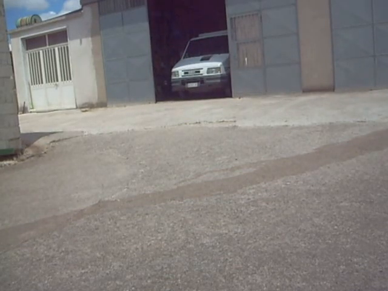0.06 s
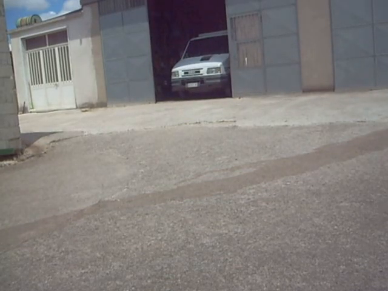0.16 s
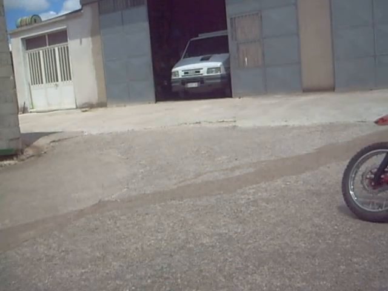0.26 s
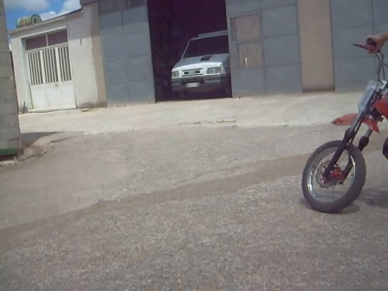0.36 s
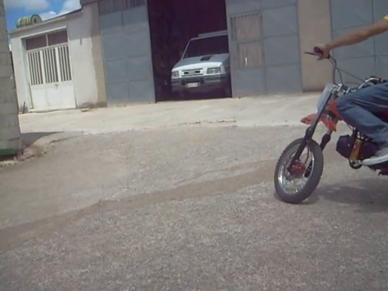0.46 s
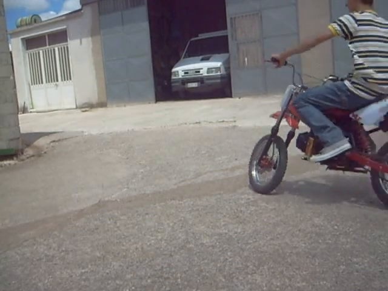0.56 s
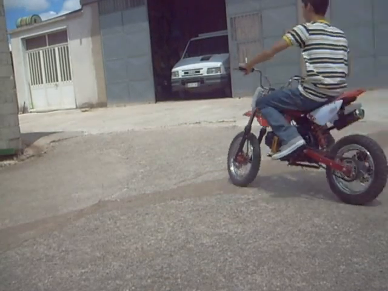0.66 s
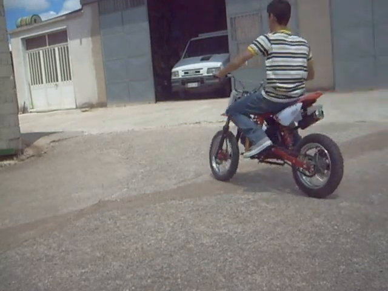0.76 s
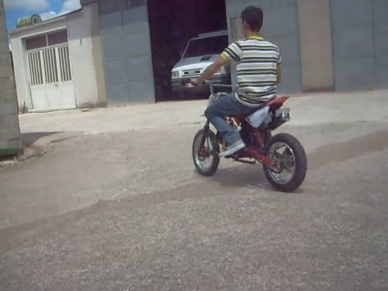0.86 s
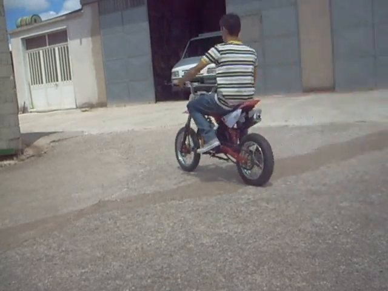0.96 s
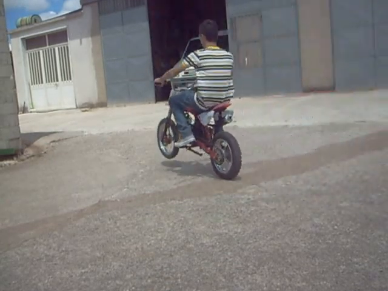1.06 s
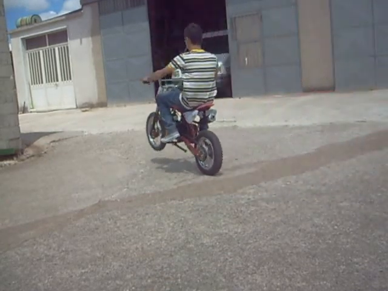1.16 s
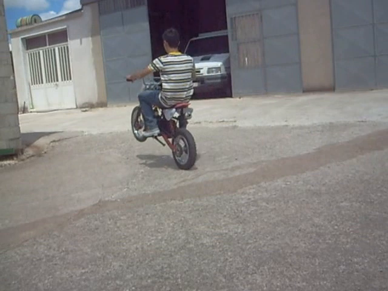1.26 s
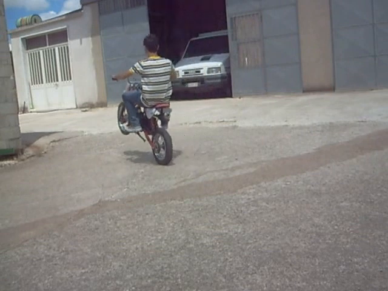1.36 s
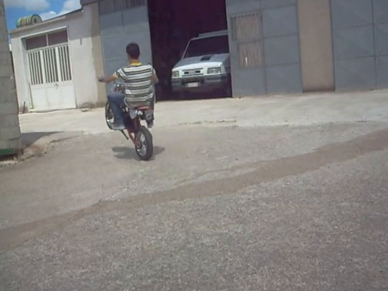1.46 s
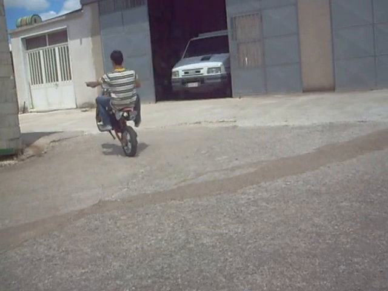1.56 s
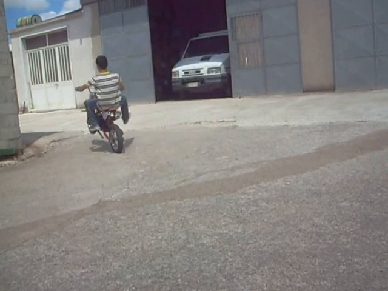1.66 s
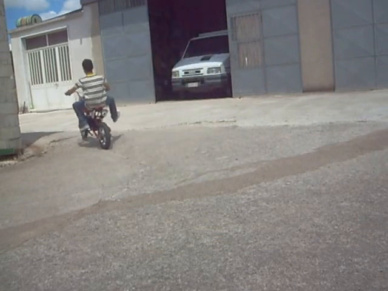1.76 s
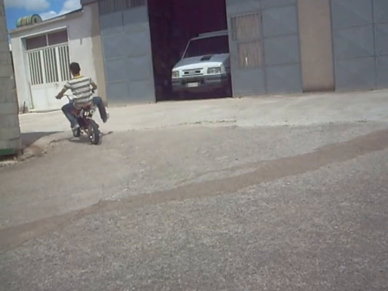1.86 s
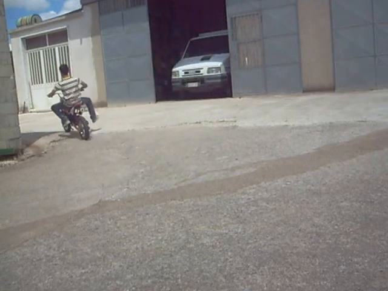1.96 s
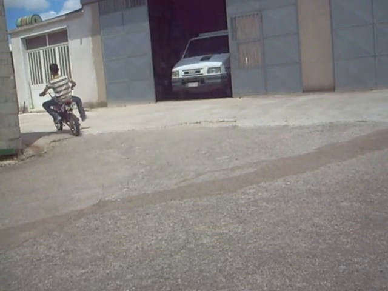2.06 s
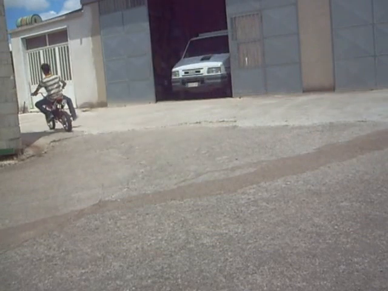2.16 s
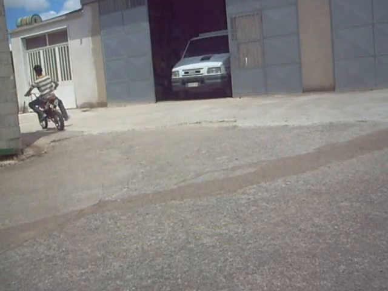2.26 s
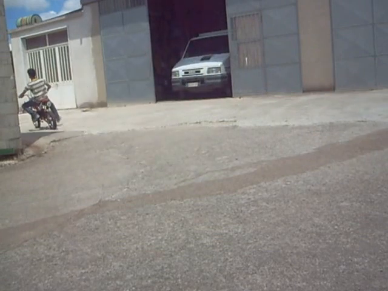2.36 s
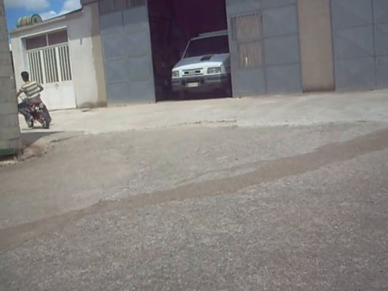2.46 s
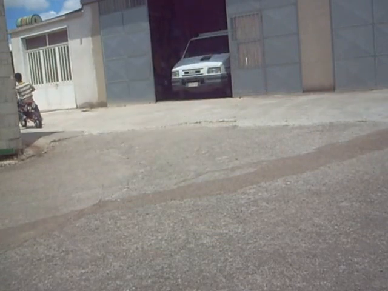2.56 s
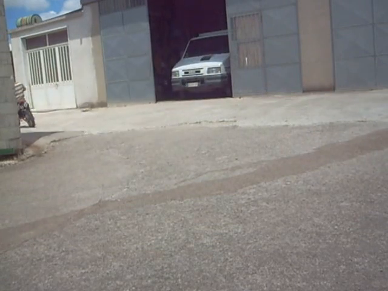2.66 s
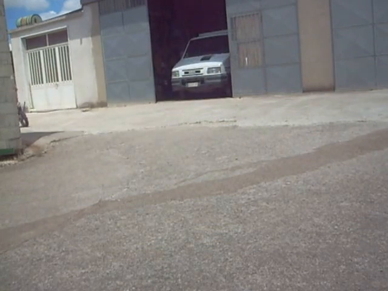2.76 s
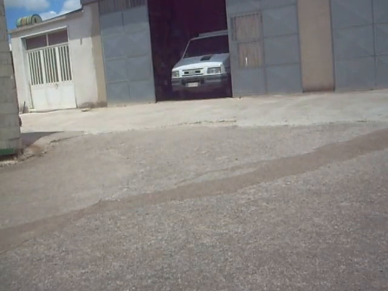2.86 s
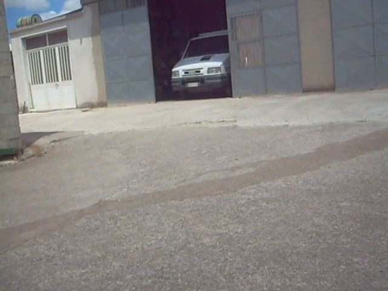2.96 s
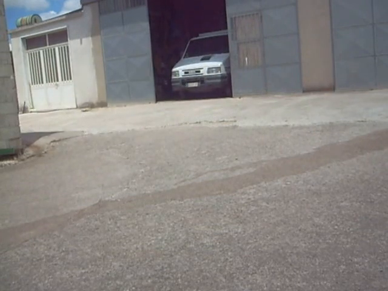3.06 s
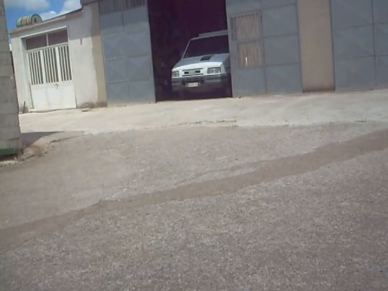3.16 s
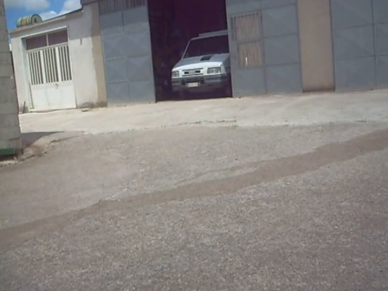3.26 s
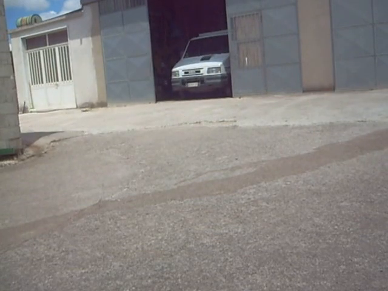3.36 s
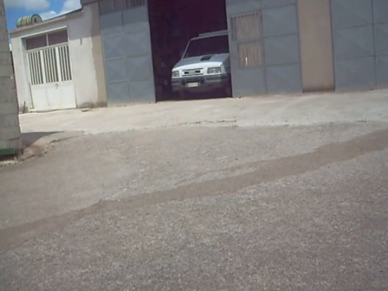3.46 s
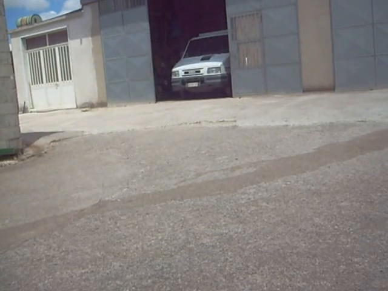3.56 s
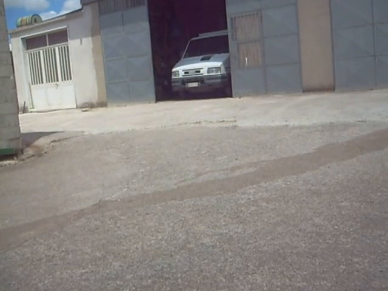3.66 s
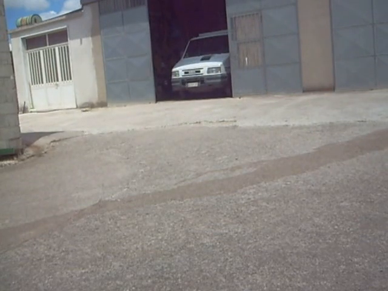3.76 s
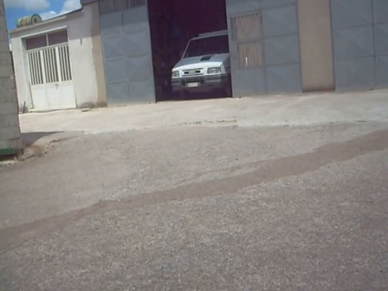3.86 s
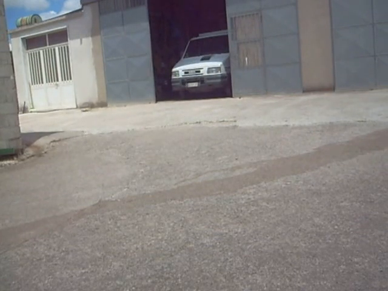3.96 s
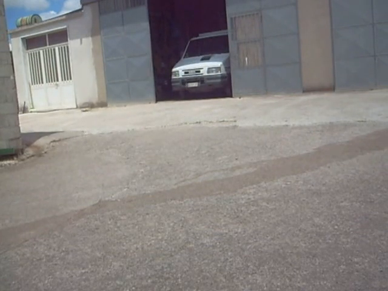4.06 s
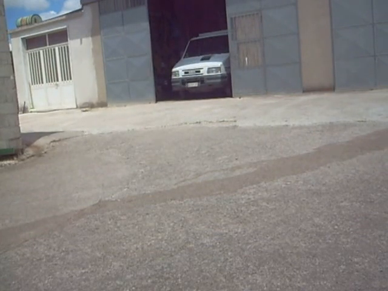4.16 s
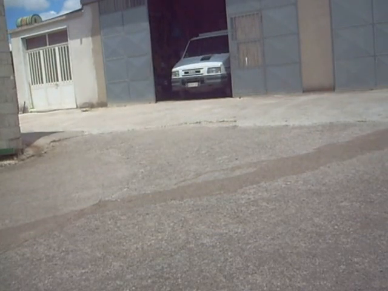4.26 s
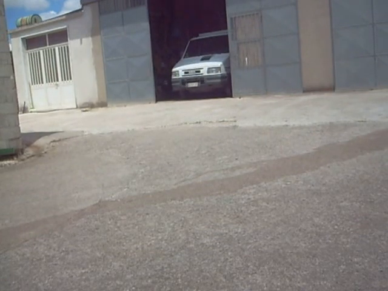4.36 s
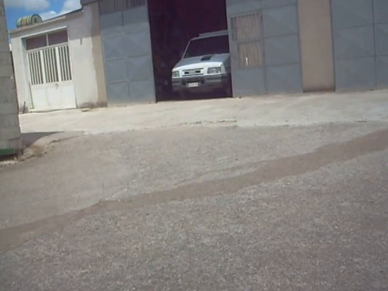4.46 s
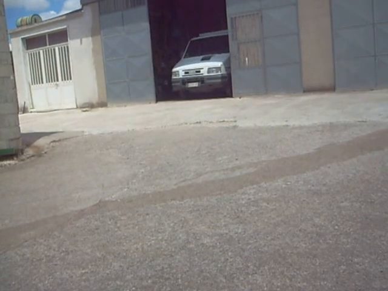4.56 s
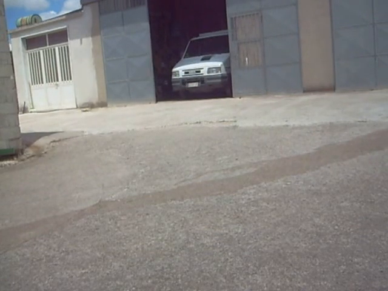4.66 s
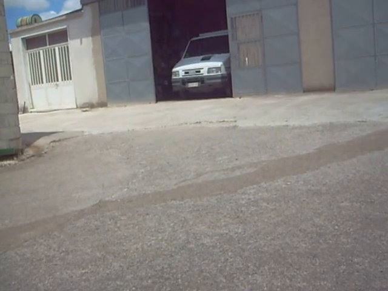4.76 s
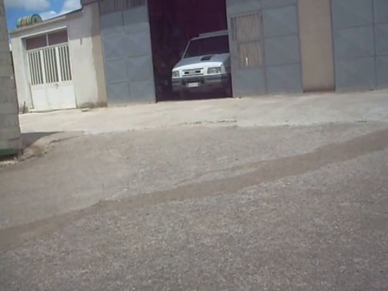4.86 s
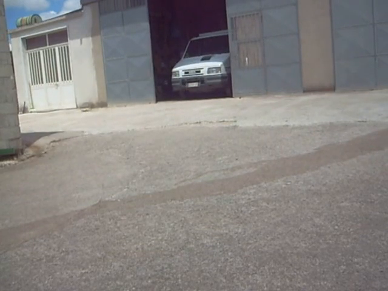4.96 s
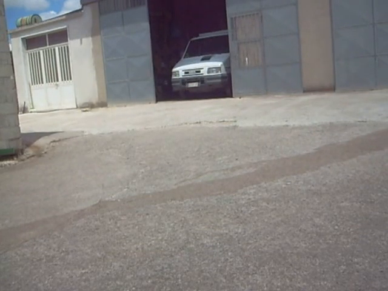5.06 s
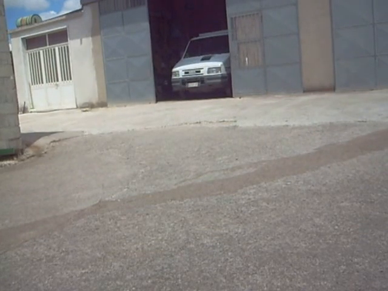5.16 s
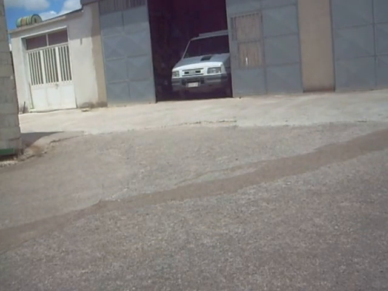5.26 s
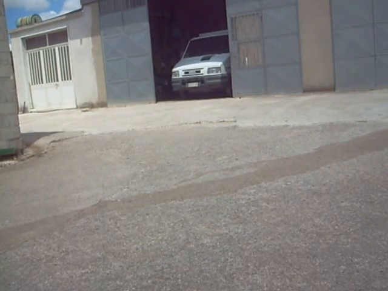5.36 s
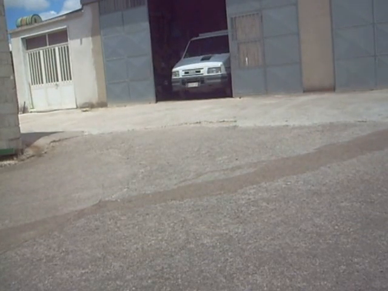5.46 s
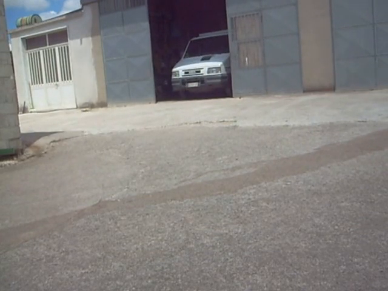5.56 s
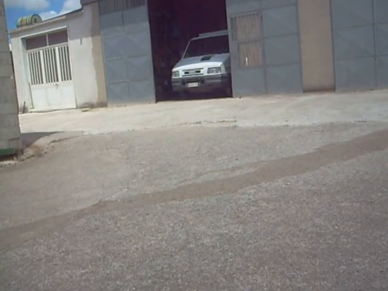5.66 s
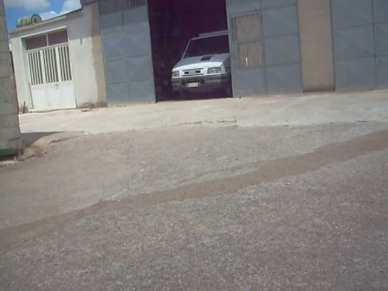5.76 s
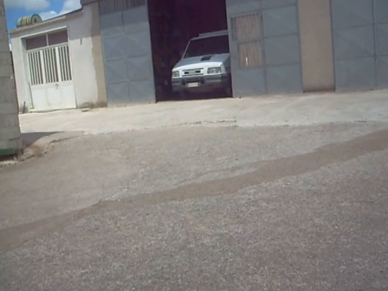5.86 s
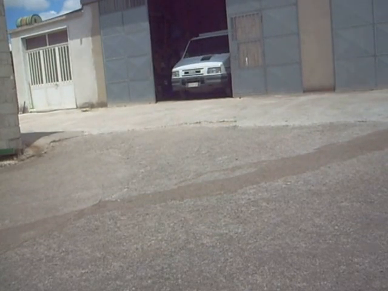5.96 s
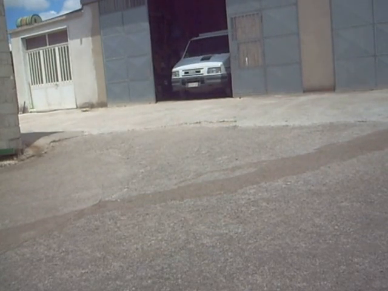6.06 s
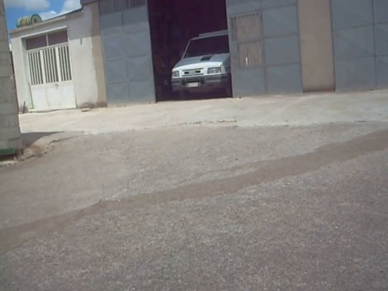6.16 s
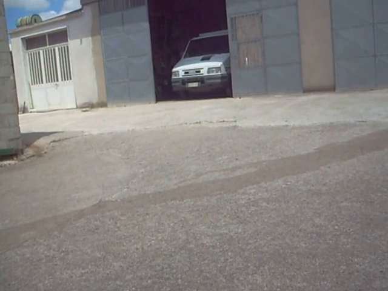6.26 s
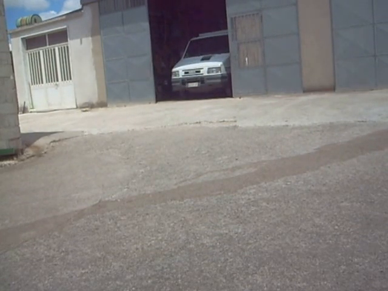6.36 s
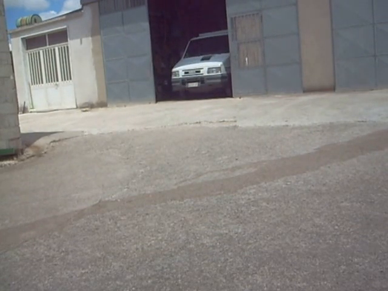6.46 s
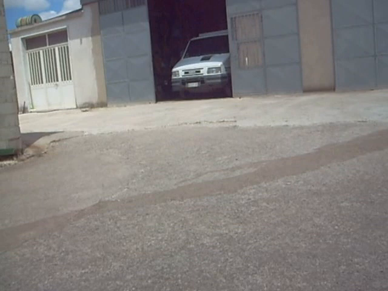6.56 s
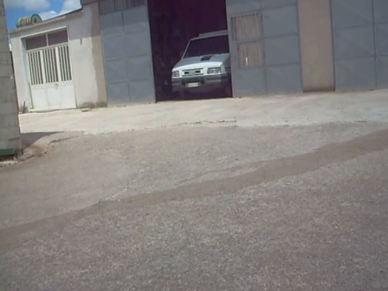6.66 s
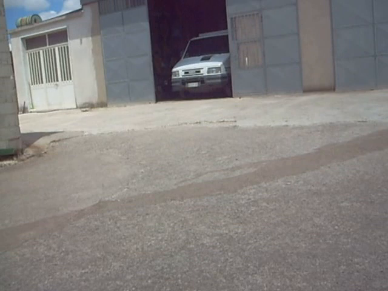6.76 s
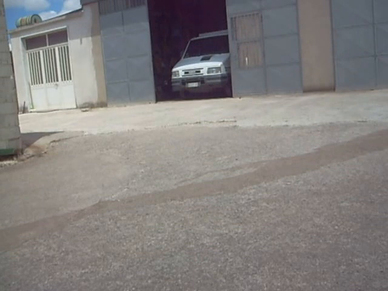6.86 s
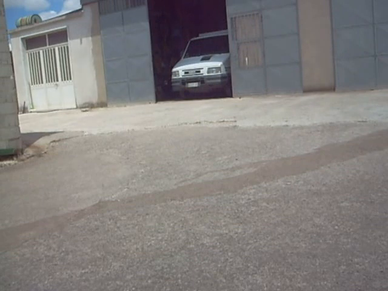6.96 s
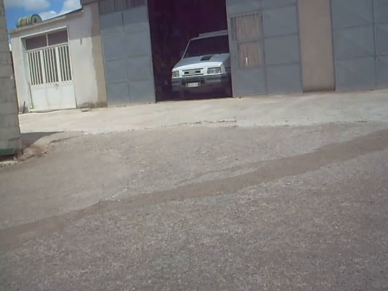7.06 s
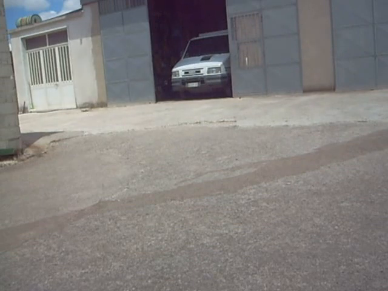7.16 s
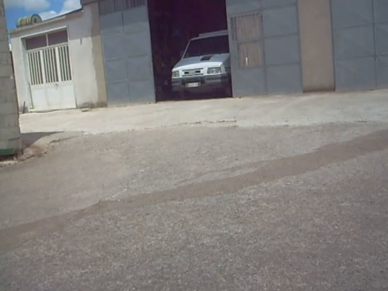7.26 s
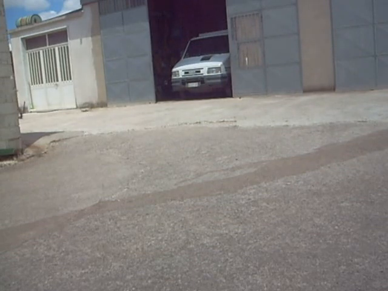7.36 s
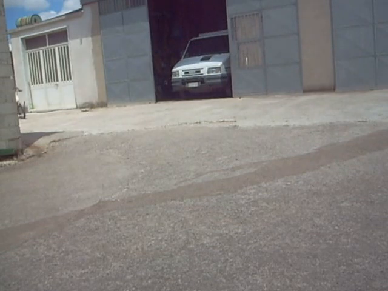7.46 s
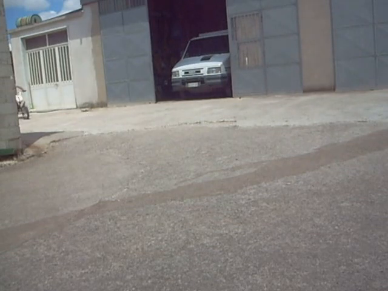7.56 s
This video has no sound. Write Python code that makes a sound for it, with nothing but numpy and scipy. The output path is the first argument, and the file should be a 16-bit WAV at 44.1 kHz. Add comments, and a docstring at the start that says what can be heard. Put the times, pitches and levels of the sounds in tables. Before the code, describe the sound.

Raspy little dirt bike blips and accelerates away across a hard yard, drops to distant uneven puttering, then gives another muffled burst of throttle.

```python
"""A small single-cylinder motorbike, mostly screened by a wall throughout, revs in bursts, pulls away to a
rough idle, then blips again. Each firing barks at the exhaust outlet and thumps in the pipe; ground and sheds
echo the bark. Valve clatter, jingle, loose metal and drive knocks ride on top, over air buffeting and faint
hiss. Outlet and small microphone give the bark a peak near 3 kHz; overloads clip."""
import sys
import numpy as np
from scipy import signal
from scipy.fft import rfft, irfft
from scipy.io import wavfile
from scipy.ndimage import uniform_filter1d

SR = 44100
rng = np.random.default_rng(int(sys.argv[2]) if len(sys.argv) > 2 else 0)


def how_loud(loudness_db):
    """Turn decibels into a plain amplitude multiplier (0 dB gives 1, 20 dB gives 10)."""
    steps = np.asarray(loudness_db, float) / 20
    return 10 ** steps


def persist_wave(psi):
    """Save psi, clipped to +-1, as 16-bit WAV."""
    counts = np.round(np.clip(psi, -1, 1) * 32767).astype(np.int16)
    wavfile.write(sys.argv[1], SR, np.atleast_2d(counts).T)


N = 336042
T = np.arange(N) / SR

# engine speed: time_s, firings_per_s
FIRING_RATE = [(0.0, 20.05), (0.12, 17.19), (0.22, 24.47), (0.37, 17.81), (0.47, 18.4), (0.56, 27.9),
               (0.62, 18.5), (0.87, 17.88), (0.98, 22.13), (1.04, 31.52), (1.15, 27.7), (1.44, 35.37),
               (1.52, 27.68), (1.61, 33.46), (1.69, 30.87), (1.86, 33.75), (1.98, 28.48), (2.05, 29.0),
               (2.15, 30.5), (2.25, 30.0), (2.41, 26.6), (2.78, 16.69), (2.94, 14.54), (3.33, 12.91),
               (3.55, 15.72), (3.95, 14.13), (4.35, 15.91), (4.55, 14.2), (4.73, 15.7), (5.14, 15.49),
               (5.61, 16.8), (5.86, 30.44), (6.0, 33.09), (6.3, 27.6), (6.36, 28.5), (6.49, 33.3),
               (6.555, 34.0), (6.64, 28.3), (6.71, 23.8), (6.79, 16.73), (7.1, 17.34), (7.62, 14.57)]
# firings of set strength: time_s, level_db
SET_FIRINGS = [(.508, 1.5), (.548, 3.5), (1.003, -3), (1.039, 4), (1.368, -1.5), (1.398, -5.5), (1.427, 0),
               (1.457, -1.5), (1.487, -9), (1.649, 2.5), (1.745, 1), (1.776, 4), (1.836, 1.5), (1.866, 2.5),
               (1.897, 2), (2.665, 3.5), (2.776, 8), (2.837, 6), (3.261, 5.5), (3.337, 7), (3.544, 6.5),
               (3.809, 8.5), (3.944, 6.5), (4.154, 2.5), (4.409, 7), (4.478, 9.5), (4.614, 10.5),
               (4.746, 9.5), (4.809, 8), (4.937, 8.5), (5.13, 11), (5.323, 3.5), (5.444, 8), (5.802, 3),
               (5.904, 4), (6.028, 4.5), (6.33, 7.5), (6.432, 4.5), (6.463, 4.5), (6.536, 2.5), (7.253, 6),
               (7.441, 3.5)]
# exhaust pipe modes: mode_hz, width_hz, open_throttle_db, shut_throttle_db
PIPE_MODES = [(65.5, 39, -19, -27), (108, 37, -20.5, 9.5), (166, 16.5, 10, 0.5), (235.6, 56, -31, 6),
              (288, 58, 4.5, -9), (324.8, 17.2, -17.5, 5), (447.5, 153, -10, -30.5), (642, 87, -33, -30)]
# revving pipe heard round the wall from far off: mode_hz, width_hz, level_db, heat_exponent
FAR_PIPE_MODES = [(65.2, 32, -10, .5), (164.7, 21.4, 7.5, 1.4), (301, 22, 6.5, .1), (353, 59, -2.5, 0.52),
                  (523, 70, -5, .5), (613, 62, -10, 0.24), (720, 65, -8.5, .3)]
# microphone and outlet colour: freq_hz, gain_db
OUTLET_COLOUR = [(400, -27), (700, -17), (1050, -18.5), (1250, -11.5), (1600, 0), (2000, -5.5), (2500, 5),
                 (2850, 6.5), (3200, -3), (3600, -10), (4000, -14.5), (5000, -24), (7500, -29),
                 (10000, -35), (13000, -66.5), (16000, -84.5)]
# ground and shed fronts: delay_s, level_db
YARD_ECHOES = [(.0025, -8), (0.013, -19), (0.017, -24), (0.024, -15), (.033, -25), (0.046, -9)]
# loose metal shakes: start_s, drive_db, decay_s
METAL_RATTLES = [(0.252, -41, 0.0085), (0.37, -39, .006), (0.925, -33.5, 0.01), (0.959, -29, 0.0097),
                 (2.237, -32.5, 0.016), (2.283, -36, 0.014), (3.01, -55, 0.055), (3.28, -55, 0.053),
                 (3.33, -45.5, 0.038), (3.6, -62, 0.013), (3.67, -55.5, 0.017), (3.74, -56, 0.013),
                 (3.937, -55, 0.0096), (4.01, -56, 0.012)]
# metal part modes: mode_hz, width_hz, level_db
TIN_MODES = [(4900, 317, 13.5), (5970, 370, 9.5), (6750, 570, 11.5), (8800, 5400, -3.5)]
# engine casing modes: mode_hz, width_hz, level_db
CASING_MODES = [(995, 112, 12.5), (1487, 665, 6), (1975, 190, -0.5)]
# drive slack taken up: start_s, drive_db, decay_s
DRIVE_KNOCKS = [(.25, -31.5, 0.035), (.552, -22.5, 0.017), (.584, -32, 0.043), (.7, -34, 0.025),
                (.974, -14.5, 0.0045)]
# throttle grip: start_s, roll_on_s, held_s, roll_off_s, added_opening_0_1, chain_pull (negative: coasting)
GRIP_TWISTS = [(.12, 0.09, 0.08, 0.082, 0.55, 0.15), (0.472, 0.036, 0.047, 0.16, 0.46, 0.17),
               (0.971, 0.035, 0.43, 0.13, 1, 0.35), (1.499, 0.2, 0.16, 0.19, 0.82, 0.54),
               (1.96, 0.11, 0.57, 0.114, 0.46, -0.25), (5.499, 0.34, 0.26, 0.23, 0.49, 0.5),
               (6.199, 0.3, 0.033, 0.22, 1, 0.4)]
# bike position: time_s, distance_m, wall_0_1, outlet_aim_0_1
BIKE_PATH = [(0, 2.9, 0.65, 0.04), (.25, 3.36, 0.85, 0.26), (0.5, 2.1, 0.73, 0.9), (0.702, 3.25, 0.8, 0.85),
             (.9, 2.42, 0.95, 0.91), (1.03, 2.07, 0.63, 0.98), (1.4, 2.2, 0.61, 0.82),
             (1.9, 2.75, 0.74, 0.9), (2.2, 4.07, 0.82, 1), (2.5, 5.5, 0.92, 0.98), (2.6, 7.9, 0.93, 0.87),
             (2.72, 11.1, 0.89, 0.65), (2.999, 12.7, 0.91, 0.44), (4.201, 16.5, 0.97, 0.16),
             (5.401, 19, 0.86, 0), (6.001, 10.6, 0.84, 0.19), (6.5, 8.25, 0.95, 0.18),
             (6.9, 11.7, 0.91, 0.01), (7.62, 15, 0.92, 0.07)]

START_PHASE_CYCLES = .92
ECHO_DRIFT = .06  # scale of the delay wander, share of delay
FAR_SHED_S, FAR_SHED_DB = .016, -1  # echo level with the wall fully between
# levels at 1 m, throttle shut; then added by full throttle, full aim, full wall
BARK_DB, BARK_OPEN_DB, BARK_AIM_DB, BARK_WALL_DB = -20.5, 12.5, 8, -4
PIPE_DB, PIPE_OPEN_DB, PIPE_AIM_DB, PIPE_WALL_DB = -23, 4.5, -1.5, -0.5
PIPE_FAR_OPEN_DB = -1  # full throttle, far off
# treble relative to bark
TREBLE_DB, TREBLE_OPEN_DB, TREBLE_AIM_DB, TREBLE_WALL_DB = -18.5, 4.5, 3, -7
TREBLE_REMOTE_OPEN_DB = -4
# shares: idle gas load; clatter in the open, behind the wall (capped in bark), masked by firing load
IDLE_LOAD, CLATTER_NEAR, CLATTER_WALL, CLATTER_MASKED = 0.58, 0.11, 1, 0.74
GAS_RASP = 0.032  # steady rasp share at full throttle
JET_DB = -41.5  # at 1 m, before the throttle and wall gates


def level(x, db):
    """Scale to an rms level."""
    return x * how_loud(db) / np.sqrt(np.mean(x ** 2))


def ring(x, modes):
    """Sum of band-pass resonances of alternating sign."""
    total = 0
    for k, (hz, width_hz, db) in enumerate(modes):
        b, a = signal.iirpeak(hz, hz / width_hz, SR)
        total = total + (-1) ** k * how_loud(db) * signal.lfilter(b, a, x)
    return total


def band(x, hz, kind, order=4):
    """Butterworth low-pass or high-pass."""
    return signal.sosfilt(signal.butter(order, hz, kind, fs=SR, output="sos"), x)


def colour(x, points, size=2048):
    """Causal filter through (Hz, dB) points, from the folded cepstrum of the log gain."""
    hz, db = np.transpose(points)
    grid_hz = np.arange(size // 2 + 1) * SR / size + 1
    gain_db = np.interp(np.log(grid_hz), np.log(hz), db)
    cep = irfft(np.log(how_loud(gain_db)))
    cep[1:size // 2] *= 2
    cep[size // 2 + 1:] = 0
    return signal.fftconvolve(x, irfft(np.exp(rfft(cep))))[:N]


def smear(x, rise_s, fall_s, size=4000):
    """Give every pulse an envelope of unit energy."""
    t = np.arange(size) / SR
    shape = (1 - np.exp(-t / rise_s)) * np.exp(-t / fall_s)
    return signal.fftconvolve(x, shape / np.sqrt(np.sum(shape ** 2)))[:N]


def flicker(rate_hz, step_db):
    """Quick random gain; steps are smoothed in dB."""
    k = int(SR / rate_hz)
    steps = np.repeat(rng.standard_normal(N // k + 1), k)
    return how_loud(step_db * uniform_filter1d(steps, k)[:N])


def grip():
    """Each twist rolls the throttle on, holds it and lets go; gives opening and chain pull."""
    total = 0
    for s, on_s, held_s, off_s, *size in GRIP_TWISTS:
        rise = (T - s) / on_s
        fall = 1 - (T - s - on_s - held_s) / off_s
        total = total + np.outer(size, np.clip(np.minimum(rise, fall), 0, 1))
    return total


def firings(rate, phase, scatter_db):
    """One pulse per cycle, mean power independent of speed; sizes scatter, some are set."""
    at = np.flatnonzero(np.diff(np.floor(phase)))
    db = scatter_db * rng.standard_normal(len(at))
    for s, set_db in SET_FIRINGS:
        db[np.argmin(abs(at / SR - s))] = set_db
    pulses = np.zeros(N)
    pulses[at] = how_loud(db) / np.sqrt(rate[at])
    return pulses


def crack_and_puff(pulses, rate, crack, far):
    """Gas leaves the outlet as a sharp crack or a soft noisy puff, mixed by crack share."""
    sharp = .6 * np.roll(pulses, int(.0008 * SR))
    sharp = sharp + smear(pulses, .001, .001) * rng.standard_normal(N)
    # puff swells from just ahead of the crack
    swell = smear(smear(np.roll(pulses, -int(.003 * SR)), .002, .002), .002, .003)
    # many paths round the wall draw the puff out, most at idle
    drawn = smear(pulses, .003, .014)
    spread = far ** 2 * np.interp(rate, [18, 27], [.4, .1])
    swell = (1 - spread) * level(swell, 0) + spread * level(drawn, 0)
    soft = swell * flicker(250., 0.82) * rng.standard_normal(N)
    return np.sqrt(crack) * level(sharp, 0) + np.sqrt(1 - crack) * level(soft, 0)


def yard_echoes(fired, far):
    """Rough ground and shed fronts return smeared, dulled copies at wandering delays."""
    wander = np.interp(T, np.arange(0, 8, .2), rng.standard_normal(40))
    t = np.arange(600) / SR
    scatter = rng.standard_normal(len(t)) * np.exp(-t / .002)
    scattered = level(signal.fftconvolve(fired, scatter)[:N], 0) * fired.std()
    scattered = band(scattered, 6000., "low", order=1)

    def late(delay_s):
        """Scattered bark after a wandering delay."""
        lag = (delay_s * SR * (1 + ECHO_DRIFT * wander)).astype(int)
        return scattered[np.maximum(np.arange(N) - lag, 0)]

    yard = sum(how_loud(db) * late(s) for s, db in YARD_ECHOES)
    return yard + how_loud(FAR_SHED_DB) * far ** 4 * late(FAR_SHED_S)


def valve_jingle(pulses):
    """Valve gear rings the metal parts 14 ms after each firing."""
    shake = smear(np.roll(pulses, int(0.014 * SR)), 0.0016, 0.0016) * rng.standard_normal(N)
    return level(ring(shake, TIN_MODES), -18.5)


def running_clatter():
    """Flickering noise of the running engine, plain and rung by the casing."""
    running = flicker(180., 0.68) * rng.standard_normal(N)
    return running + ring(running, CASING_MODES)


def bark(pulses, rate, phase, crack, clatter, far, casing):
    """Outlet bark with a new tint per cycle, yard echoes, jingle, casing ring and clatter."""
    crack, clatter, far = np.clip(crack, 0, 1), np.clip(clatter, 0, .45), np.clip(far, 0, 1)
    fired = crack_and_puff(pulses, rate, crack, far)
    # per-cycle gains: lows, highs, jingle
    cycle = np.floor(phase + .25).astype(int)
    tint = how_loud([4, 2, 4] * rng.standard_normal((cycle[-1] + 1, 3)))[cycle].T
    low, high = band(fired, 2400., "low", order=2), band(fired, 3300., "high", order=2)
    fired = fired + (tint[0] - 1) * low + (tint[1] - 1) * high
    fired = fired + yard_echoes(fired, far)
    fired = level(fired, 0) + tint[2] * valve_jingle(pulses)
    fired = fired + (0.045 + 0.48 * casing) * ring(fired, CASING_MODES)
    return np.sqrt(1 - clatter) * level(fired, 0) + np.sqrt(clatter) * level(running_clatter(), 0)


def gas_jet(pulses):
    """Gas jet hiss after each firing, bright off the far shed."""
    jet = smear(np.roll(pulses, int(FAR_SHED_S * SR)), .003, .006) * rng.standard_normal(N)
    jet = band(band(jet, 4500., "high", order=2), 13000., "low")
    return level(jet, JET_DB)


def answer(hz, column, modes=PIPE_MODES):
    """Complex resonant answer of the pipe modes at these frequencies."""
    total = 0
    for k, m in enumerate(modes):
        damping = 1j * hz * m[1]
        total = total + (-1) ** k * how_loud(m[column]) * damping / (m[0] ** 2 - hz ** 2 + damping)
    return total


def pipe_tone(rate, phase, load, far, count=30, size=20):
    """Firing harmonics drive the pipe modes, computed at SR / size."""
    slow = slice(None, None, size)
    rate, phase, load, far, t = rate[slow], phase[slow], load[slow], far[slow], T[slow]
    lag = rng.uniform(-np.pi, np.pi, count + 1)
    steps = np.arange(0, T[-1] + 1, .065)
    waver = rng.standard_normal((count + 1, 2, len(steps)))
    # hotter gas at higher speed lifts the modes
    heat, cool = (rate / 29.9) ** 0.66, (rate / 16.5) ** 0.094
    # thump leads the bark at idle
    early = phase + np.interp(load, [.58, .73], [.003, .0003]) * rate
    fast = np.interp(rate, [20, 28], [0, 1])
    tone = 0
    for k in range(1, count + 1):
        hz = k * rate
        gain = load * answer(hz / heat, column=2) + (1 - load) * answer(hz / cool, column=3)
        round_wall = sum(answer(hz / heat ** m[3], column=2, modes=[m]) for m in FAR_PIPE_MODES)
        gain = gain + far * fast * (round_wall - gain)
        # shifting yard paths scatter phases and make upper lines waver
        depth = np.minimum((hz / 420) ** 1.4, 1.2)
        sway_gain, sway = (np.interp(t, steps, w) * depth for w in waver[k])
        turn = 2 * np.pi * k * early + far ** 4 * (.5 + .5 * fast) * lag[k]
        turn = turn + (.5 + .3 * far + .3 * fast) * sway
        tone = tone + np.sqrt(rate) * how_loud(4.0 * sway_gain) * np.real(gain * np.exp(1j * turn))
    return band(signal.resample_poly(tone, size, 1)[:N], 800.0, "low", order=2)


def pipe(rate, phase, load, far):
    """Pipe tone gated into uneven putts when slow and close, blended with resonant burble."""
    load, far = np.clip(load, 0, 1), np.clip(far, 0, 1)
    tone = pipe_tone(rate, phase, load, far)
    # slow and close, the pipe sags between firings
    putt = (1 - .5 * far ** 4) * np.interp(rate, [24, 31], [.65, 0])
    after_s = (phase + .004 * rate) % 1 / rate
    gate = 1 - putt + 1.9 * putt * np.exp(-(after_s / .027) ** 2)
    # per-cycle strength
    cycle = np.floor(phase + .15).astype(int)
    uneven_db = (.8 + 2.5 * putt) * rng.standard_normal(cycle[-1] + 1)[cycle]
    gate = gate * uniform_filter1d(how_loud(uneven_db), 200)
    shut_modes = [(hz, width_hz, db) for hz, width_hz, _, db in PIPE_MODES]
    burble = ring(rng.standard_normal(N), shut_modes)
    rough = .11 + .12 * putt + .12 * far + .2 * far ** 4 * np.interp(rate, [17, 24], [1, 0])
    mixed = np.sqrt(1 - rough) * level(gate * tone, 0) + np.sqrt(rough) * level(burble, 0)
    return band(mixed, 43.0, "high", order=2)


def rattles(rows, modes):
    """Short noisy shakes swell in, ring the metal and die away."""
    shake = 0
    for s, db, decay_s in rows:
        age_s = np.maximum(T - s, 0)
        shake = shake + how_loud(db) * (1 - np.exp(-age_s / 0.0035)) * np.exp(-age_s / decay_s)
    return shake * level(ring(flicker(300., 4.1) * rng.standard_normal(N), modes), 0)


def air_buffet():
    """Air movement buffets the microphone: low noise, dB relative to the pipe."""
    return level(band(rng.standard_normal(N), 45.0, "low", order=2), -47)


def air_hiss():
    """Faint steady band of noise."""
    hiss = band(band(rng.standard_normal(N), 10500., "low"), 4630.0, "high", order=2)
    return level(hiss, -78.0)


def scene():
    """Throttle and position set the bark and pipe; rattles, knocks and hiss are added."""
    s, *columns = np.transpose(BIKE_PATH)
    metres, far, aim = (np.interp(T, s, c) for c in columns)
    opened, pull = grip()
    far, aim, opened = np.clip(far, 0, 1), np.clip(aim, 0, 1), np.clip(opened, 0, 1)
    rate = np.interp(T, *np.transpose(FIRING_RATE))
    phase = START_PHASE_CYCLES + np.cumsum(rate) / SR
    throttle = IDLE_LOAD + (1 - IDLE_LOAD) * opened
    # the wall scatters only what comes from far off
    remote = far * np.clip((metres - 4.5) / 5, 0, 1)

    bark_db = BARK_DB + BARK_OPEN_DB * opened + BARK_AIM_DB * aim + BARK_WALL_DB * far
    pipe_db = PIPE_DB + PIPE_OPEN_DB * opened + PIPE_AIM_DB * aim + PIPE_WALL_DB * far
    pipe_db = pipe_db + PIPE_FAR_OPEN_DB * opened * np.clip(metres / 8 - .5, 0, 1)
    treble_db = TREBLE_DB + TREBLE_OPEN_DB * opened + TREBLE_AIM_DB * aim + TREBLE_WALL_DB * far
    treble_db = treble_db + TREBLE_REMOTE_OPEN_DB * remote * opened
    clatter = CLATTER_NEAR + (CLATTER_WALL - CLATTER_NEAR) * far
    clatter = clatter * (1 - CLATTER_MASKED * opened) * (1 - aim) + GAS_RASP * opened
    # a revving engine still crackles round the wall
    crack = aim * (1 - far ** 2) * np.clip(throttle, 0, 1) ** 3 * 2.1
    crack = crack + remote ** 2 * np.interp(rate, [20, 28], [.08, .25])
    casing = 1 - aim + .5 * far ** 4 * opened + (1 - far ** 4) * (1 - opened)

    pulses = firings(rate, phase, scatter_db=1.5)
    outlet = colour(bark(pulses, rate, phase, crack, clatter, far, casing), OUTLET_COLOUR)
    body, treble = band(outlet, 4600., "low"), band(outlet, 4600., "high")
    rasp = how_loud(bark_db) * (level(body, 0) + how_loud(treble_db) * level(treble, 0))
    rasp = rasp + remote * np.interp(opened, [.46, .6], [0, 1]) * gas_jet(pulses)
    thump = how_loud(pipe_db) * (pipe(rate, phase, IDLE_LOAD + pull, remote) + air_buffet())
    loose = rattles(METAL_RATTLES, TIN_MODES) + rattles(DRIVE_KNOCKS, CASING_MODES)
    return ((rasp + thump) / metres + loose + air_hiss())[None]


def low_pass(x):
    """Removes everything above the highest recorded frequency."""
    return signal.sosfilt(signal.butter(12, 16410, fs=SR, output="sos"), x)


def record(dry):
    """The converter clips overloads and trims both ends of the spectrum."""
    clipped = np.clip(dry, -.97, .97)
    trimmed = band(clipped, 35., "high", order=2)
    mix = band(trimmed, 11200.0, "low", order=6)
    return low_pass(mix)


dry = scene()
out = record(dry)
persist_wave(out)
```